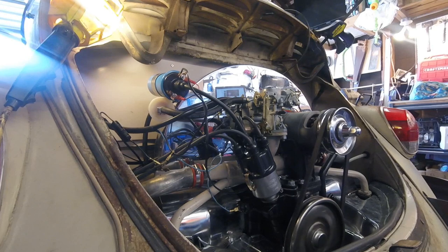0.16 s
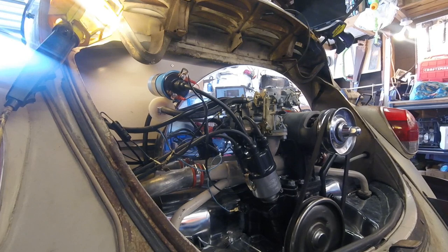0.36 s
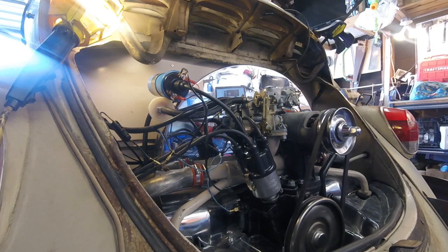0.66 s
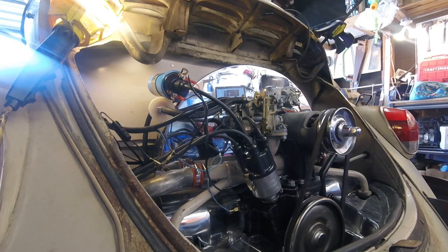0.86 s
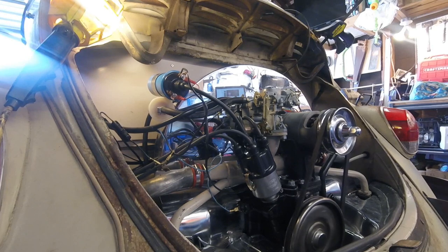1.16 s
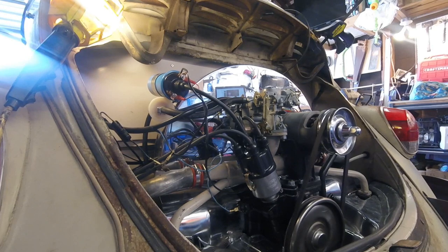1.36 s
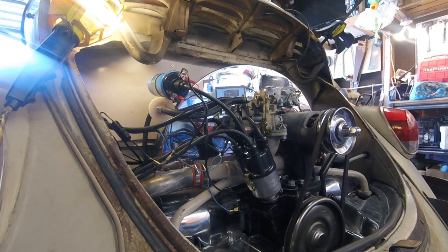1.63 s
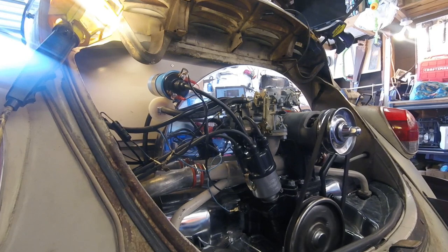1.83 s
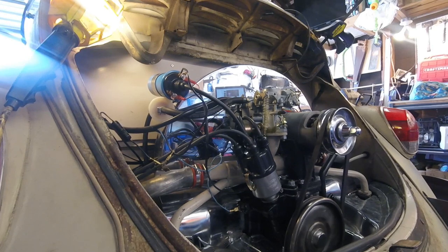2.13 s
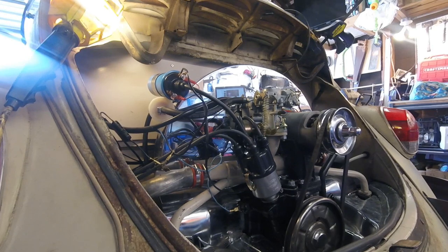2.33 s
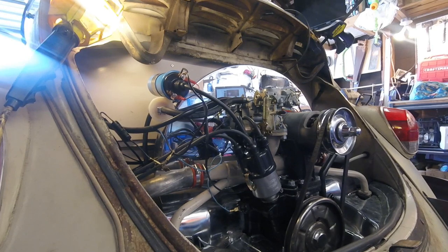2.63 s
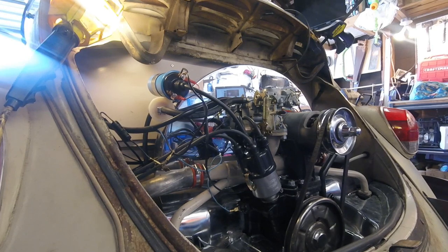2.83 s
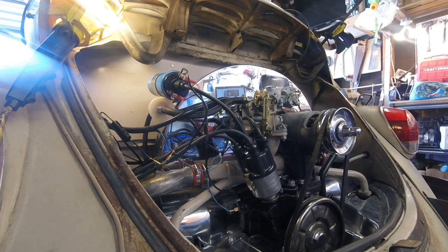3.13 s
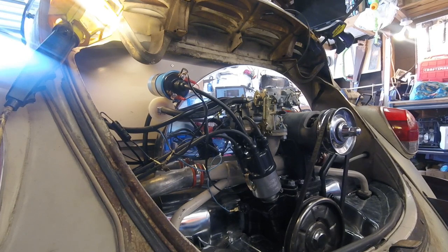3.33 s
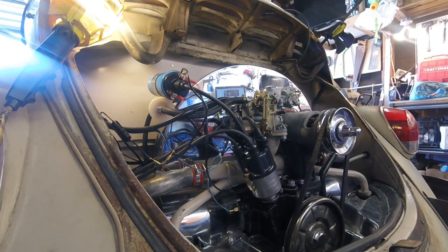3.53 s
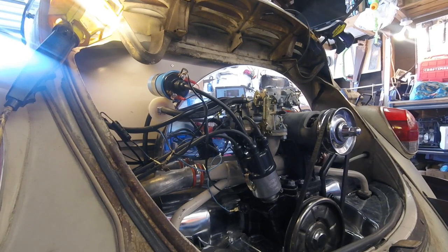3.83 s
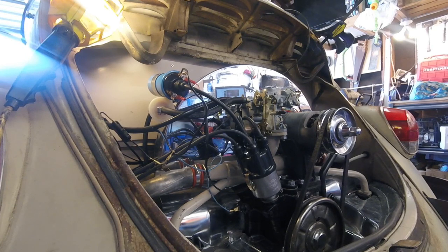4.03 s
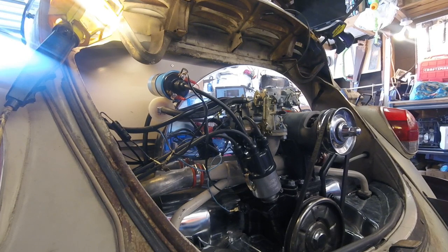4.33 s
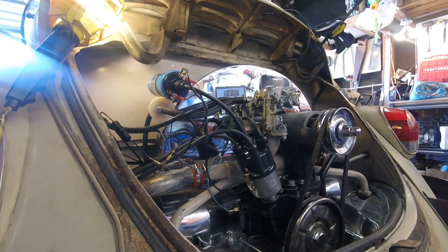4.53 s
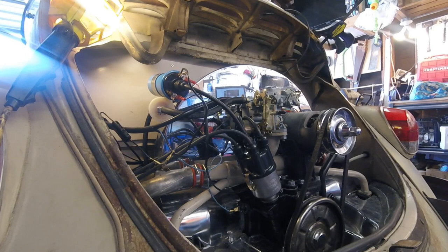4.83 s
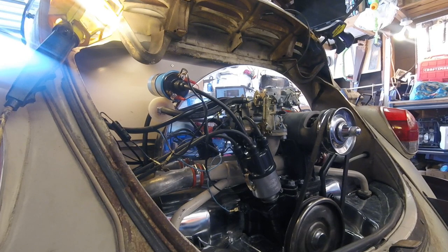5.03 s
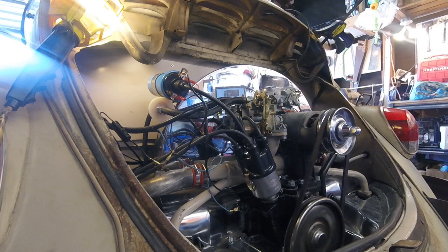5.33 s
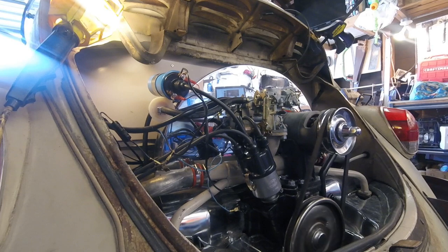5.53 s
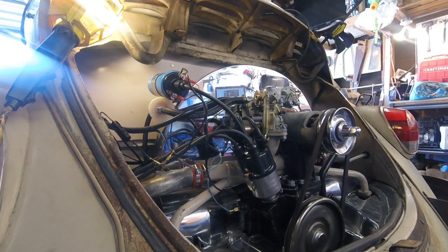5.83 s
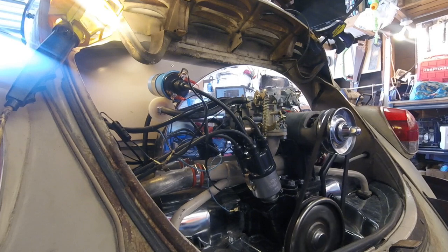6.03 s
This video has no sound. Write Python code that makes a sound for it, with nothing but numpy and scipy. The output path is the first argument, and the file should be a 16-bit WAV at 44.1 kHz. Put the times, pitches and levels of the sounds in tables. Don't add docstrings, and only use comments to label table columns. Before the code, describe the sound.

A starter cranks an air-cooled engine in a garage, a rough gritty churn with about eight pulses a second and low exhaust puffs. After two seconds it runs down, the pinion clacks and a latch snaps. A fuel pump ticks faintly through a near-silent pause with small rustles, then louder cranking returns to the end. Close small microphone, little echo.

```python
import sys
import numpy as np
from scipy import signal
from scipy.fft import rfft, irfft, next_fast_len
from scipy.io import wavfile
from scipy.ndimage import uniform_filter1d

SR = 44100
rng = np.random.default_rng(int(sys.argv[2]) if len(sys.argv) > 2 else 0)


def boost(x):
    u = np.asarray(x, float) / 20
    return 10 ** u


def store_wav(level_fs):
    pcm = np.round(np.clip(np.atleast_2d(level_fs), -1, 1) * 32767)
    wavfile.write(sys.argv[1], SR, pcm.T.astype(np.int16))


N = 272405


def rms_of(x):
    return np.sqrt(np.mean(x ** 2))


def rms_one(x):
    return x / np.sqrt(np.mean(x ** 2) + 1e-20)


def in_time(rows):
    s, db = np.transpose(rows)
    return np.interp(np.arange(N) / SR, s, db, left=-140, right=-140)


def clicks(seconds, sizes):
    out = np.full(N, 1e-18)
    at = np.round(np.asarray(seconds) * SR).astype(int)
    out[np.clip(at, 0, N - 1)] = sizes
    return out


def grains(per_s, spread_db):
    sizes = boost(spread_db * np.minimum(rng.exponential(1, N), 5)) * rng.choice([-1, 1], N)
    return rms_one(sizes * (rng.random(N) < per_s / SR))


def drift(per_s, count):
    steps = rng.standard_normal((count, 400))
    at = np.clip(np.arange(N) * per_s / SR, 0, 398)
    return np.array([np.interp(at, np.arange(400), row) for row in steps])


def add(out, s, size, rise, decay):
    first = max(int(s * SR), 0)
    t = np.arange(min(int(16 * decay * SR), N - first)) / SR
    out[first:first + len(t)] += size * (1 - np.exp(-t / rise)) * np.exp(-t / decay)
    return out


def burst(s, rise, decay):
    return add(np.zeros(N), s, 1, rise, decay)


def swells(rows, rise):
    power = np.zeros(N)
    for s, db, decay in rows:
        add(power, s, boost(2 * db), rise, decay / 2)
    return np.sqrt(power)


def ring(x, hz, t60):
    radius, w = boost(-60 / (t60 * SR)), 2 * np.pi * hz / SR
    return signal.lfilter([0, np.sin(w)], [1, -2 * radius * np.cos(w), radius ** 2], x)


def resonances(x, peaks, wander_db=0.0):
    strength = boost(wander_db * drift(16, count=len(peaks)))
    total = np.zeros(N)
    for k, (hz, width, db) in enumerate(peaks):
        mode = ring(x * strength[k], hz, 3.25 / width)
        total += (-1) ** k * boost(db) * width * mode
    return rms_one(total)


def coloured(x, spectrum):
    hz, db = np.transpose(spectrum)
    size = next_fast_len(N)
    grid = np.arange(size // 2 + 1) * SR / size + 1
    gain = boost(np.interp(np.log(grid), np.log(hz), db))
    return rms_one(irfft(rfft(x, size) * gain, size)[:N])


def filtered(x, order, hz, kind):
    return signal.sosfilt(signal.butter(order, hz, kind, fs=SR, output="sos"), x)


# (time [s], clatter peak [dB], body [dB], decay [s])
STROKES = [(0.103, -18.5, -20.5, 0.047), (0.2263, -15.5, -20, 0.055), (0.355, -20, -22, 0.11),
           (0.471, -18.5, -18, 0.032), (0.5918, -13.5, -25, 0.02), (0.709, -13.5, -18.5, 0.021),
           (0.84, -12, -21, 0.023), (0.961, -16, -18, 0.03), (1.078, -14, -24, 0.03),
           (1.189, -12.5, -31, 0.034), (1.314, -14.5, -20, 0.027), (1.435, -10.5, -16.5, 0.017),
           (1.555, -11.5, -15.5, 0.018), (1.673, -11, -21, 0.019), (1.802, -18.5, -18.5, 0.029),
           (1.9105, -19, -20, 0.01), (5.042, -12.5, -10.5, 0.018), (5.245, -13, -41, 0.019),
           (5.367, -13.5, -18.5, 0.036), (5.5188, -11, -14.5, 0.021), (5.645, -11.5, -16.5, 0.025),
           (5.773, -11, -15, 0.023), (5.887, -10.5, -17.5, 0.027), (6.016, -23, -17.5, 0.042),
           (6.135, -11.5, -12, 0.0082)]
# (time [s], effort [dB])
EFFORT = [
    [(0.0, 3), (0.25, -4.5), (0.6, 1), (1.9, 2), (2.05, -4), (2.2, -3.5), (2.3, -11.5), (2.6, -14.5),
     (2.85, -34.5)],
    [(5.036, -0.5), (5.09, -1.5), (5.15, -0.5), (5.2, 2.5), (5.4, 1.5), (5.9, 0), (6.177, 3.5)],
]
CASE_DB, TINWARE_DB, MESH_DB = -33.5, -34, -36
CASE_FOLLOWS, TINWARE_FOLLOWS, MESH_FOLLOWS = 0.8, 1.09, 1.78
SAG_DB, SAG_LEAD_S, SAG_S = -0.5, 0.017, 0.097


def meshing():
    effort = np.max([in_time(rows) for rows in EFFORT], axis=0)
    t = np.arange(-.1, .1, 1 / SR)
    dip = np.exp(-(2 * t / SAG_S) ** 2)
    sag = signal.fftconvolve(clicks(np.transpose(STROKES)[0] - SAG_LEAD_S, 1), dip, "same")
    layers = [(CASE_DB, CASE_FOLLOWS), (TINWARE_DB, TINWARE_FOLLOWS), (MESH_DB, MESH_FOLLOWS)]
    gains = [boost(db + follows * (effort + SAG_DB * sag)) for db, follows in layers]
    return [uniform_filter1d(gain, size=150) ** 2 for gain in gains]


# (time of the pressure crest [s], puff [dB])
PUFFS = [(0.043, -28), (0.168, -25), (0.3, -23.5), (0.417, -24.5), (0.542, -28), (0.658, -25), (0.784, -23),
         (0.902, -24.5), (1.024, -25.5), (1.141, -22.5), (1.264, -23.5), (1.38, -25), (1.502, -28),
         (1.62, -22.5), (1.741, -24.5), (1.86, -23), (1.987, -29), (5.318, -21.5), (5.46, -23),
         (5.587, -23), (5.71, -25), (5.831, -21), (5.955, -21.5), (6.073, -22.5)]
# (time of the crest [s], level [dB])
TEETH = [(0.0422, -23), (0.078, -45), (0.1195, -23), (0.1779, -22), (0.2326, -20), (0.2873, -23.7),
         (0.3628, -26), (0.4231, -28), (0.4851, -18), (0.5406, -24.6), (0.6204, -22), (0.6414, -33),
         (0.6643, -22), (0.715, -24), (0.737, -23), (0.7782, -25.5), (0.8213, -33), (0.8488, -27),
         (0.9655, -18), (1.0174, -22.5), (1.0641, -35), (1.0993, -21), (1.1391, -21), (1.1722, -24.9),
         (1.2088, -17.5), (1.2579, -22.7), (1.326, -17.5), (1.3401, -24), (1.3834, -23), (1.4463, -21),
         (1.5076, -24.5), (1.5841, -18), (1.6819, -21.5), (1.7274, -20.5), (1.8103, -20), (1.8661, -23),
         (1.9149, -30), (1.9476, -31), (1.969, -33),
         (5.055, -16), (5.1671, -30), (5.2178, -29), (5.2557, -22), (5.3333, -32), (5.3922, -16.5),
               (5.4647, -25.2), (5.5438, -22), (5.5915, -35), (5.6551, -29), (5.788, -24.5),
               (5.8354, -22.3), (5.9137, -22), (5.9505, -24), (5.9948, -28), (6.0248, -21.6), (6.0647, -29),
               (6.0974, -25.9), (6.1387, -20.9)]
# (frequency [Hz], width [Hz], level [dB])
CASE = [(176.2, 16, -1.5), (216.7, 52.5, 0), (255, 57, 0.5), (290, 32, 0.5), (337, 68, -11)]
# (frequency [Hz], width [Hz], level [dB])
TINWARE = [(423, 100, 2), (519, 54, 3), (547, 140, 1), (639.6, 32, 4), (685, 33, 1), (776, 49, -4)]
# (frequency [Hz], width [Hz], level [dB])
GEARS = [(1380, 32, 0), (1760, 28, -1), (1970, 38, 0), (2300, 38, 0), (2430, 32, 1), (2620, 50, -4),
         (2890, 38, 0), (3280, 60, -6), (3684, 35, -3), (4030, 35, -4), (4437, 45, -4), (4890, 70, -4),
         (5290, 70, -8), (5914, 50, -4)]
# (frequency [Hz], density [dB per Hz])
CLATTER = [(300, -4), (900, -1.5), (1500, -7.5), (2400, -3), (4200, -5.5), (5800, -4.5), (7000, -9.5),
           (8500, -15.5), (9300, -16.5), (10200, -27.5), (11200, -18.5), (12100, -40), (12900, -53),
           (15000, -76)]
# (frequency [Hz], density [dB per Hz])
RUMBLE = [(25, -7), (45, 30.5), (90, 19), (140, 29.5), (200, -38)]
TOOTH_DB, TOOTH_RISE_S, TOOTH_DECAY_S = -3, 0.0052, 0.0062
VALVE_CLATTER_DB, VALVE_CASE_DB = -30, -52
WHIRR_DB, WHIRR_HZ = -5.5, (845, 2070)


def cranking():
    case, tinware, mesh = meshing()
    rumble = boost(-5.0) * np.sqrt(case) * coloured(rng.standard_normal(N), RUMBLE)
    clatter = np.zeros(N)
    for s, clatter_db, body_db, decay in STROKES:
        add(clatter, s, boost(2 * (clatter_db - 13.0)), 0.004, decay)
        add(tinware, s, boost(2 * (body_db - 9.0)), 0.0087, 1.64 * decay)
        add(case, s + 0.0046, boost(2 * (body_db - 9.5)), .009, 2.0 * decay)
    for s, puff_db in PUFFS:
        add(clatter, s - .004, boost(2 * VALVE_CLATTER_DB + 2.2 * (puff_db + 22.5)), .003, 0.0072)
        add(case, s - .012, boost(2 * VALVE_CASE_DB), .008, 0.072)
    for s, peak_db in TEETH:
        add(clatter, s - TOOTH_RISE_S, boost(2 * (peak_db + TOOTH_DB)), TOOTH_RISE_S, TOOTH_DECAY_S)

    sharp = coloured(grains(6000, spread_db=2.5), CLATTER)
    soft = filtered(sharp[::-1], 2, 7000, "low") + boost(-15.0) * np.roll(sharp, SR)
    drive = np.sqrt(0.79 * mesh + clatter)
    gear_modes = resonances(drive * grains(3000, spread_db=2.5), GEARS, wander_db=3.0)
    gears = boost(-3.5) * rms_of(drive) * gear_modes
    heavy = grains(900, spread_db=1.5)
    whirr = rms_one(filtered(grains(4000, spread_db=2.5), 2, WHIRR_HZ, "band"))
    tin = np.sqrt(tinware) * (resonances(heavy, TINWARE, wander_db=3.0) + boost(WHIRR_DB) * whirr)
    block = np.sqrt(case) * resonances(heavy[::-1], CASE, wander_db=1.0)
    return np.sqrt(clatter) * sharp + np.sqrt(mesh) * soft + gears + tin + block + rumble


def rung(rows, db, rise, decay):
    out, t = np.zeros(N + SR), np.arange(SR // 4) / SR
    shape = (1 - np.exp(-t / rise)) * np.exp(-t / decay)
    shape = shape / shape.max()
    for (s, peak_db, hz), phase in zip(rows, rng.uniform(0, 2 * np.pi, len(rows))):
        first = max(int((s - rise) * SR), 0)
        tone = np.sin(2 * np.pi * hz * t + phase)
        out[first:first + len(t)] += boost(peak_db + db) * shape * tone
    return out[:N]


# (time [s], peak [dB], frequency [Hz])
CASE_RINGS = [(0.053, -21, 246), (0.121, -22, 245), (0.238, -24, 280), (0.288, -21, 290), (0.334, -27, 296),
              (0.373, -27, 283), (0.431, -20.5, 275), (0.501, -20, 263), (0.595, -15.5, 270),
              (0.687, -22, 216), (0.726, -16, 248), (0.795, -23, 223), (0.834, -23.5, 226),
              (0.883, -15, 263), (0.928, -24, 263), (0.978, -17, 228), (1.041, -22, 253), (1.103, -20, 282),
              (1.162, -15, 221), (1.263, -18, 268), (1.31, -18, 237), (1.403, -18.5, 255),
              (1.438, -19.5, 276), (1.509, -23, 230), (1.545, -16, 229), (1.578, -23, 193),
              (1.645, -30, 276), (1.701, -18, 264), (1.732, -17, 238), (1.8, -33, 240), (1.832, -20.5, 221),
              (1.903, -24, 259), (1.946, -25, 283), (1.99, -21, 248),
              (5.049, -10.5, 253), (5.106, -19, 342), (5.142, -16.5, 294), (5.199, -14.5, 284),
                    (5.291, -30, 287), (5.326, -23, 237), (5.374, -16.5, 252), (5.425, -28, 260),
                    (5.479, -18.5, 276), (5.536, -15.5, 245), (5.614, -18, 223), (5.663, -13, 248.3),
                    (5.731, -20.5, 272), (5.794, -17.5, 230), (5.862, -18, 226), (5.892, -17.5, 215),
                    (5.959, -15.5, 277), (6.032, -18, 238), (6.112, -17, 267), (6.149, -14, 235)]
# (time [s], peak [dB], frequency [Hz])
TIN_RINGS = [(0.019, -23, 548), (0.109, -20, 391), (0.217, -22, 640), (0.364, -36, 653), (0.478, -22, 627),
             (0.568, -21, 636), (0.599, -25, 627), (0.717, -15.5, 398), (0.787, -28, 592),
             (0.816, -29, 630), (0.861, -19, 443), (0.97, -18.5, 654), (1.0, -20.5, 610), (1.077, -32, 660),
             (1.159, -20, 493), (1.275, -17, 608), (1.352, -23, 540), (1.387, -37, 620), (1.441, -20, 391),
             (1.502, -34, 618), (1.532, -27, 413), (1.563, -17.5, 459), (1.677, -24, 641),
             (1.805, -33, 644), (1.876, -27, 540), (1.996, -23.5, 430), (2.054, -30, 477),
             (5.046, -15, 557), (5.17, -26.5, 650), (5.204, -16.5, 428), (5.302, -24, 447),
                   (5.334, -15.5, 412), (5.392, -21, 517), (5.465, -14, 413), (5.652, -19, 434),
                   (5.714, -23, 648), (5.773, -23, 702), (5.891, -36, 686), (5.94, -17, 627),
                   (6.031, -23, 386), (6.06, -16, 404), (6.102, -18.5, 432), (6.132, -15, 633)]
# (time [s], peak [dB], frequency [Hz])
GEAR_RINGS = [(0.1027, -24, 2330), (0.2279, -22, 2280), (0.3586, -20, 2290), (0.4768, -23, 2360),
              (0.594, -16, 2320), (0.7138, -19, 2130), (0.844, -16, 2320), (0.9633, -34, 2370),
              (1.0794, -21, 2310), (1.1962, -26, 2420), (1.3205, -16, 2410), (1.4422, -19, 1570),
              (1.5589, -22, 2850), (1.6821, -20, 2820), (1.8053, -16, 2370),
              (5.25, -22, 1373), (5.3712, -28, 1410), (5.4959, -18.5, 3290), (5.6481, -15.5, 1970),
                    (5.7718, -18, 2310), (5.887, -14.5, 2410), (6.0187, -18, 2420), (6.0641, -18, 2350),
                    (6.1435, -22, 2290)]


def contacts():
    case = rung(CASE_RINGS, db=-5.5, rise=0.00793, decay=0.023)
    tin = rung(TIN_RINGS, db=-6.5, rise=0.004065, decay=0.022)
    gears = rung(GEAR_RINGS, db=-12.5, rise=0.002995, decay=0.018)
    return case + tin + gears


# (frequency [Hz], t60 [s])
SILENCER = [(50, .6), (59.6, .44), (66, .27), (86, .9)]
# (lead [s], then level of each silencer mode [dB] x 4)
CYLINDERS = [(.0159, -2.5, -1, -9, -11.5), (.0144, -15.5, -13, 6.5, -20), (.0165, -7, 4, -40, -16),
             (.0141, -11, -40, 6, -7.5)]
# (time [s], peak [dB], frequency [Hz], t60 [s])
ENGAGE = (5.05, -20, 88, 1.1)


def exhaust():
    s, puff_db = np.transpose(PUFFS)
    pipes = np.array(CYLINDERS)[np.arange(len(s)) % 4]
    out = ring(clicks([ENGAGE[0]], boost(ENGAGE[1])), *ENGAGE[2:])
    for k, (hz, t60) in enumerate(SILENCER):
        suction = clicks(s - pipes[:, 0], -boost(puff_db + pipes[:, k + 1]))
        out = out + ring(suction, hz, t60)
    return filtered(out, 3, 96, "low")


# (time [s], level [dB], decay [s])
LOW_PANEL = [(1.98, -31, 0.046), (2.24, -29.5, 0.11), (2.45, -37, 0.094), (2.63, -44, .04)]
# (time [s], level [dB], decay [s])
HIGH_PANEL = [(1.98, -42, 0.028), (2.07, -40, 0.037), (2.22, -45, .05), (2.38, -38.5, 0.048)]
PANEL_RISE_S, PANEL_HZ, PANEL_WAVER_HZ = 0.05, (279, 642), 8.0


def coasting():
    out, (low, high, flutter) = 0, drift(13, count=3)
    for rows, hz, waver in zip([LOW_PANEL, HIGH_PANEL], PANEL_HZ, [low, high]):
        phase = 2 * np.pi * np.cumsum(hz + PANEL_WAVER_HZ * waver) / SR
        out = out + swells(rows, PANEL_RISE_S) * np.sin(phase)
    return out * boost(4 * np.interp(np.arange(N) * 4, np.arange(N), flutter, period=N))


def struck(hit, modes, chatter_s):
    s, peak_db = hit[0]
    chatter = 0.07 * grains(1000, spread_db=3.5) * burst(s, 0.0014, chatter_s)
    touch = clicks([s], 0.41) + chatter
    return boost(peak_db - 12.5) * sum(boost(db) * ring(touch, hz, t60) for hz, db, t60 in modes)


# (time [s], peak [dB])
PINION_BACK = [(2.204, -13)]
# (frequency [Hz], level [dB], t60 [s])
PINION = [(710, -12, 0.06), (963, -2, 0.07), (1437, 1, 0.035), (1613, -5, 0.05), (1870, 5, 0.07),
          (2025, -8, 0.12), (2800, 0, 0.035), (3260, 0, 0.04), (3610, 1.5, 0.025), (4300, -3, 0.035)]


def pinion_return():
    return struck(PINION_BACK, PINION, chatter_s=0.018)


# (time [s], peak [dB])
LATCH_SHUT = [(2.57, -16.5)]
# (frequency [Hz], level [dB], t60 [s])
LATCH = [(689, -20, .4), (800, -5, 0.2), (970, 0, 0.05), (1570, -4, .04), (2100, 2, 0.05), (2326, 0, 0.035),
         (3050, 2, .03), (3290, -23, 0.55), (3345, -26, .3), (3780, -19, 0.9), (4440, 3, 0.03),
         (5540, 1, 0.02), (6250, 4, 0.03)]


def latch():
    return struck(LATCH_SHUT, LATCH, chatter_s=0.0027)


# (time [s], peak [dB], centre [Hz], width [octaves], decay [s])
TICKS = [(2.0555, -21, 3220, 0.19, 0.0096), (2.0555, -25, 5270, 0.99, 0.0073), (2.2, -46, 12400, .8, .004),
         (2.1, -40.5, 7250, 0.64, 0.05), (2.13, -28, 5600, 0.62, 0.008), (2.147, -26, 6600, 0.48, 0.0066),
         (2.2055, -14.5, 2500, 1.48, 0.008), (2.443, -40, 1880, 0.23, 0.015), (2.44, -42, 2950, .3, .008),
         (2.445, -39, 1000, 0.37, .01), (2.497, -32, 990, 0.45, 0.016), (2.4975, -22, 477, 0.54, .0086),
         (2.545, -25, 500, 1.04, 0.0083), (2.54, -44, 2600, .6, .012), (2.5697, -12, 4700, 1.2, 0.0017),
         (2.5695, -22, 9600, 1.7, 0.0017), (3.185, -58, 4750, .11, .024), (3.19, -61, 3400, 0.056, .025),
         (3.187, -56.5, 6400, 0.99, .022), (3.325, -59, 4600, .3, .015), (3.407, -52, 3100, .4, .008),
         (3.407, -47, 4800, .8, .003), (2.21, -37, 415, 0.15, .04), (2.21, -44, 700, 0.14, 0.015),
         (3.405, -46, 520, .5, .02), (3.9, -65, 4700, .4, .01), (4.605, -53, 850, .5, 0.052),
         (4.967, -46, 3300, 1.1, .039), (5.023, -34, 6200, .23, .0065), (5.024, -26.5, 500, 0.77, .026),
         (5.023, -36, 2500, 0.9, 0.022), (5.048, -20.5, 470, 2.2, 0.084)]


def knocks():
    out, noise = np.zeros(N), rng.standard_normal(N + SR)
    for s, peak_db, hz, octaves, decay in TICKS:
        band = [hz * 2 ** (-octaves / 2), min(hz * 2 ** (octaves / 2), .45 * SR)]
        near = slice(int(s * SR) - SR // 10, int(s * SR) + SR)
        shape = burst(s, 0.0007, decay)[near]
        out[near] += boost(peak_db - 6) * rms_one(filtered(noise[near], 3, band, "band")) * shape
    return out


def garage(x, t60=0.19):
    t = np.arange(SR) / SR
    tail = rng.standard_normal(SR) * boost(-60 * t / t60) * (t > .012)
    tail = signal.lfilter([1], [1, -.6], tail)
    return signal.fftconvolve(x, tail / np.sqrt(np.sum(tail ** 2)))[:N]


# (first knock [s], stop [s], peak [dB])
PUMP = [
    (2.582, 3.38, -47),
    (4.79, 5.02, -48),
]
# (frequency [Hz], level [dB], t60 [s])
PUMP_BODY = [(362, -16, .22), (401, -7, .22), (441, -8, .22), (585, -20, .3), (865, -21, .12)]
PUMP_PER_S = 17.93


def pump():
    blows = np.zeros(N)
    for first, stop, db in PUMP:
        s = np.arange(first, stop, 1 / PUMP_PER_S)
        blows += clicks(s, boost(db + rng.normal(0, 1.2, len(s))))
    return sum(boost(db) * ring(blows, hz, t60) for hz, db, t60 in PUMP_BODY)


# (time [s], length [s], rustle [dB], thud [dB])
SHIFTS = [(2.561, 0.028, -31.5, -42.5), (3.164, 0.065, -70, -56.5), (3.33, .03, -66, -58),
          (3.422, 0.1, -55.5, -54), (3.625, 0.038, -55, -59), (3.985, 0.086, -65, -72),
          (4.34, .05, -65, -74), (4.594, 0.056, -53.5, -46.5), (4.962, 0.07, -53, -56)]
# (frequency [Hz], density [dB per Hz])
RUSTLE = [(400, 3), (800, 2.5), (2500, 0.5), (5000, -5), (9000, -26)]
# (frequency [Hz], density [dB per Hz])
THUD = [(110, -16), (170, 2), (300, -6.5), (600, -13.5), (1000, -49)]
# (time [s], level [dB])
FLEXES = [(2.63, -42), (2.82, -54), (3.05, -52), (3.38, -53), (3.5, -47), (3.63, -38.5), (3.88, -46.5),
          (4.069, -46), (4.17, -47.5), (4.32, -48), (4.6, -47), (4.75, -52), (5.02, -40)]
# (time [s], level [dB], decay [s])
SQUEAKS = [(3.19, -74, .02), (3.405, -60, .02), (3.5, -76, .08), (3.64, -67, 0.033), (4.59, -69, .03),
           (4.645, -53, 0.022), (5.02, -56, .02)]
# (frequency [Hz], width [Hz], level [dB])
SQUEAK = [(9160, 110, 0)]
SHIFT_RISE_S, SETTLE_DB, SETTLE_S = 0.018, -55, 0.61
FLEX_RISE_S, FLEX_DECAY_S, HUM_DB = 0.017, 0.044, -58.5


def pause():
    rustle = swells([(s, db + 1.5, length) for s, length, db, _ in SHIFTS], SHIFT_RISE_S)
    thuds = [(s, db + 5.0, 1.28 * length) for s, length, _, db in SHIFTS]
    thud = swells(thuds + [(SHIFTS[0][0], SETTLE_DB, SETTLE_S)], SHIFT_RISE_S)
    flexes = [(s - FLEX_RISE_S, db + 2.5, FLEX_DECAY_S) for s, db in FLEXES]
    hum = boost(HUM_DB) + swells(flexes, FLEX_RISE_S)
    noise = rng.standard_normal((3, N))
    out = rustle * coloured(grains(5000, spread_db=0.5), RUSTLE) + thud * coloured(noise[0], THUD)
    out = out + hum * resonances(noise[1], [(101.6, 7.3, -3), (168, 5.1, -44.0)])
    squeak = resonances(resonances(noise[2], SQUEAK), SQUEAK)
    return out + swells(SQUEAKS, .005) * squeak


# (frequency [Hz], density [dB per Hz])
AIR = [(20, -10), (40, -15.5), (70, -7.5), (130, -17.5), (200, -19), (450, -30.5), (1000, -35),
       (2400, -39.5), (3900, -47.5), (6500, -49.5), (9000, -66)]


def room_air():
    return boost(-53.5) * coloured(rng.standard_normal(N), AIR)


def scene():
    blows = pinion_return() + latch() + knocks()
    engine = cranking() + contacts() + exhaust() + coasting()
    return (engine + blows + boost(-16.5) * garage(blows) + pump() + pause() + room_air())[None]


TOP_HZ, TOP_LOST_DB, TOP_BACK_DB_PER_S = 12400, -46, 7


def thin_top(x):
    ramp = TOP_BACK_DB_PER_S * np.arange(N) / SR
    level = 10 * np.log10(uniform_filter1d(x ** 2, size=4096) + 1e-12)
    held = np.maximum.accumulate(np.minimum(level, TOP_LOST_DB + 6) + ramp) - ramp
    top = signal.sosfiltfilt(signal.butter(10, TOP_HZ, "high", fs=SR, output="sos"), x)
    return x - top * (1 - boost(-6 * np.clip(held - TOP_LOST_DB, 0, 6)))


def band_limit(x):
    return signal.sosfilt(signal.butter(12, 14000, fs=SR, output="sos"), x)


# (frequency [Hz], density [dB per Hz])
HISS = [(2000, -20), (5700, -21), (6120, -13), (6440, 9.5), (6950, 5.5), (9300, 0), (10200, -8),
        (12000, -2), (13900, -11.5), (15000, -45)]
# (frequency [Hz], width [Hz], level [dB])
PORT = [(6310, 193, 11), (6440, 118, 12), (6710, 200, -4)]


def record(dry):
    heard = dry[0] + boost(-67.5) * coloured(rng.standard_normal(N), HISS)
    for hz, width, db in PORT:
        ridge = signal.lfilter(*signal.iirpeak(hz, hz / width, fs=SR), dry[0])
        heard = heard + boost(db - 2.0) * ridge
    return band_limit(thin_top(heard)[None])


dry = scene()
out = record(dry)
store_wav(out)
```